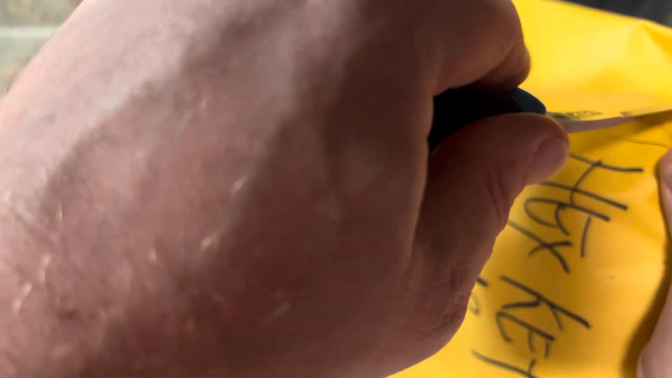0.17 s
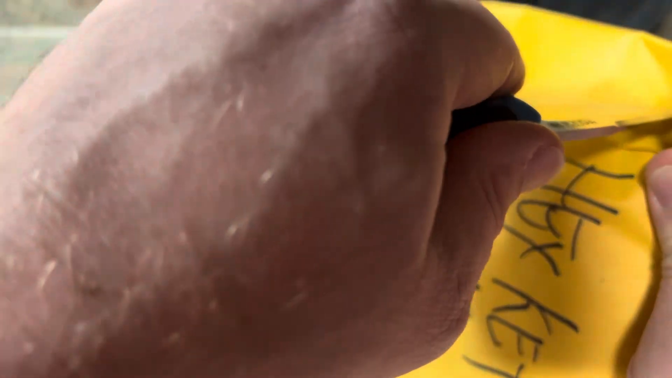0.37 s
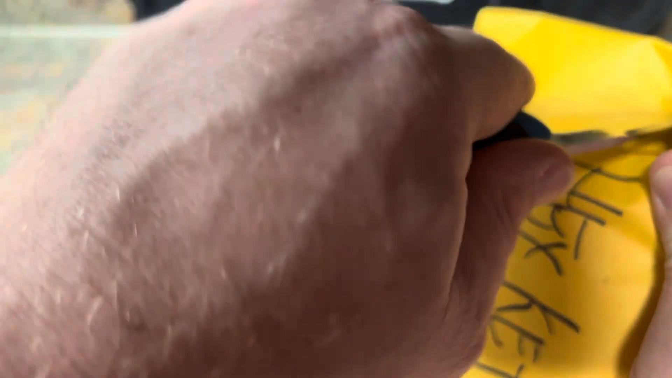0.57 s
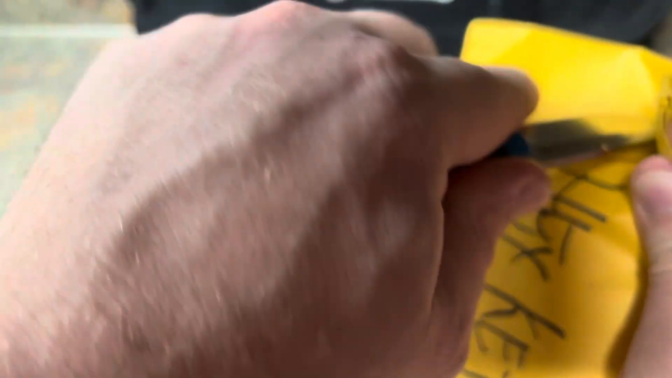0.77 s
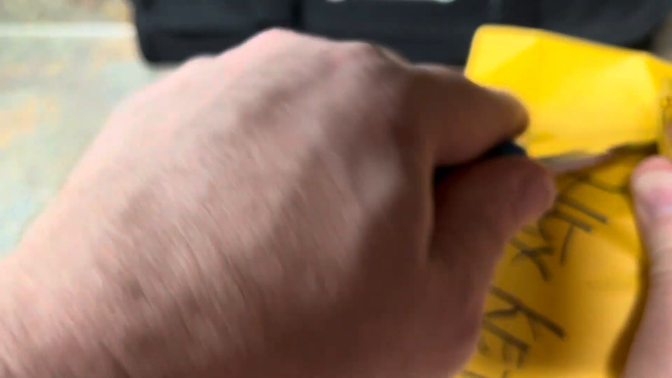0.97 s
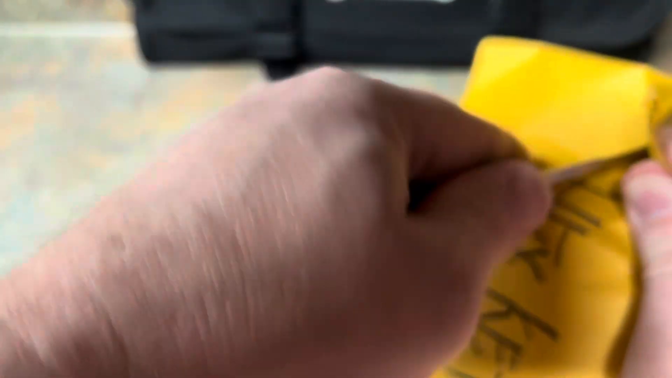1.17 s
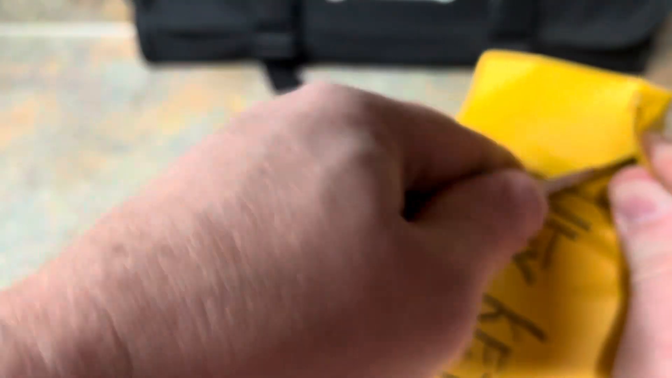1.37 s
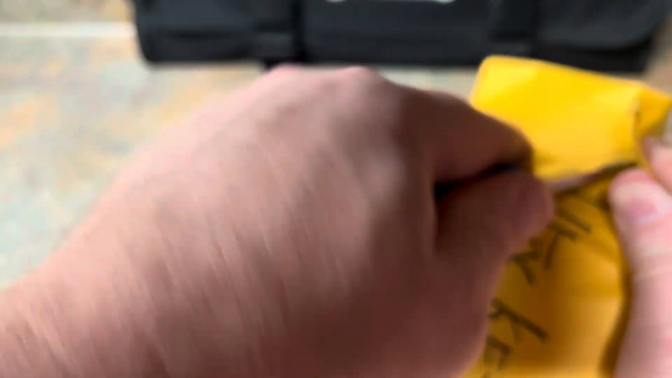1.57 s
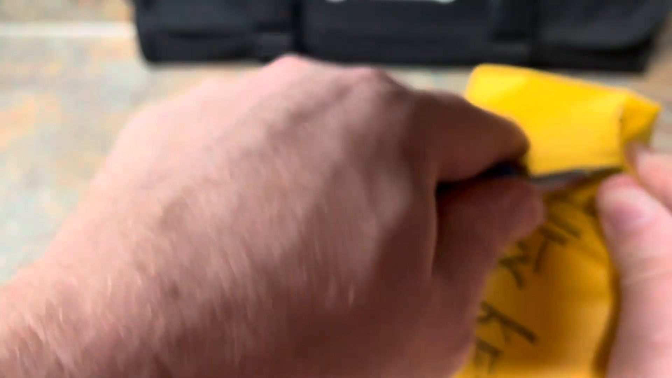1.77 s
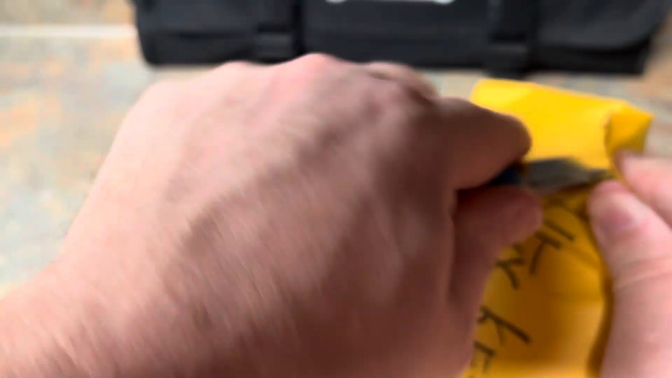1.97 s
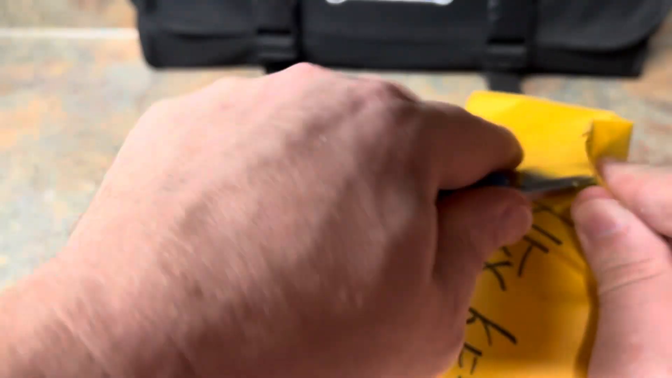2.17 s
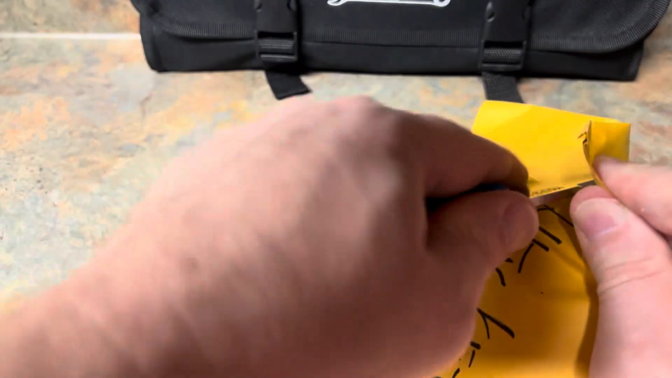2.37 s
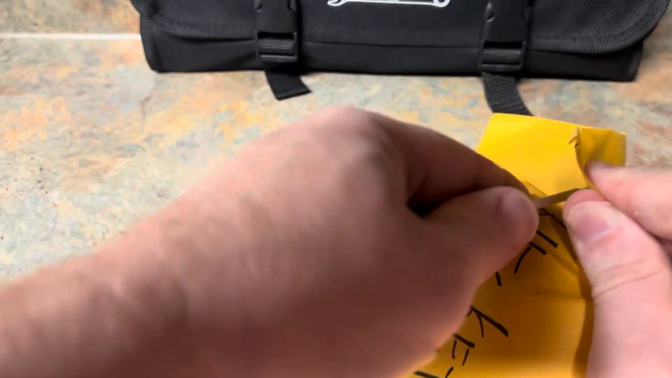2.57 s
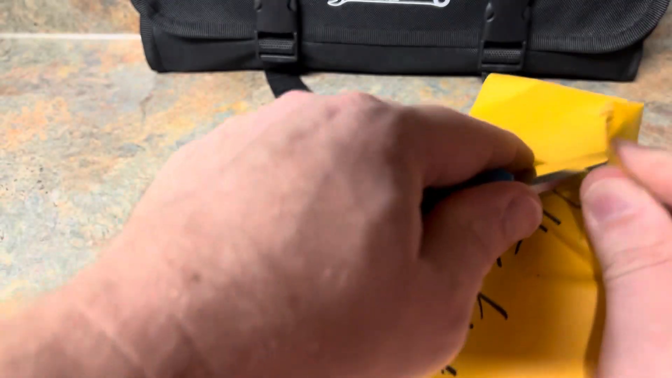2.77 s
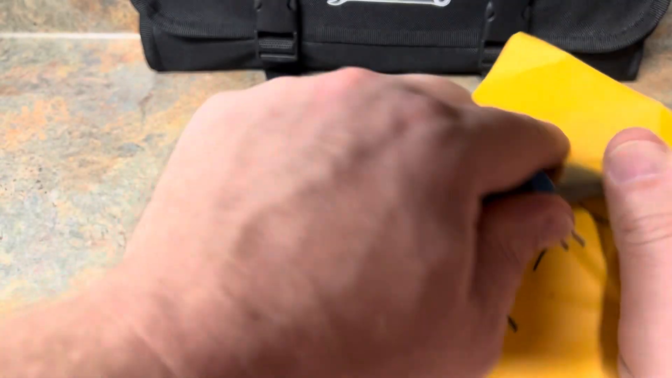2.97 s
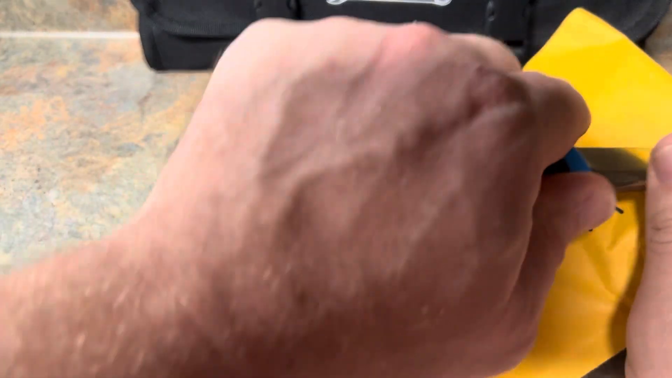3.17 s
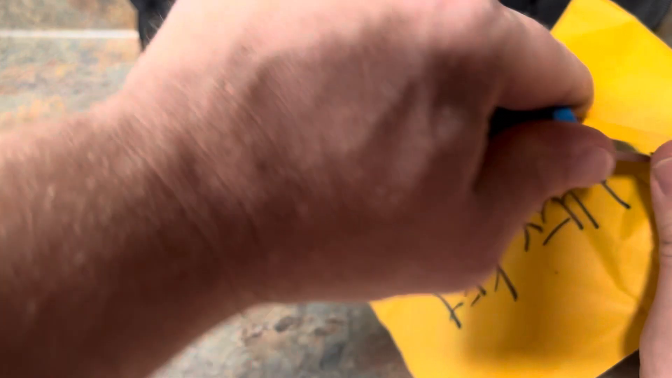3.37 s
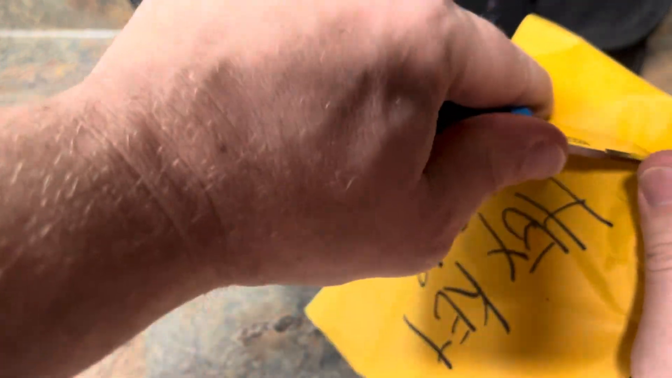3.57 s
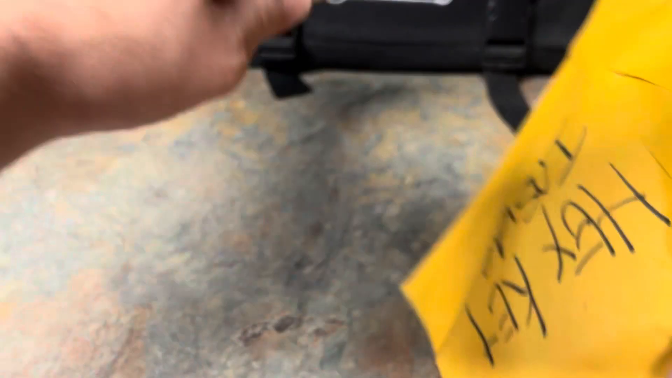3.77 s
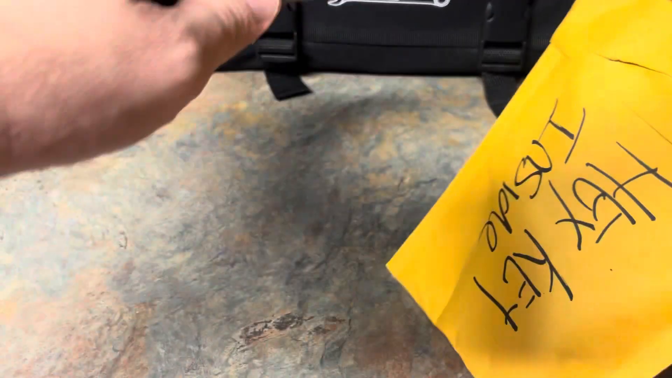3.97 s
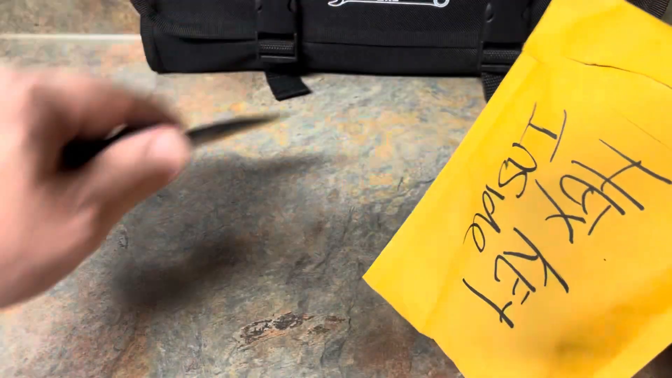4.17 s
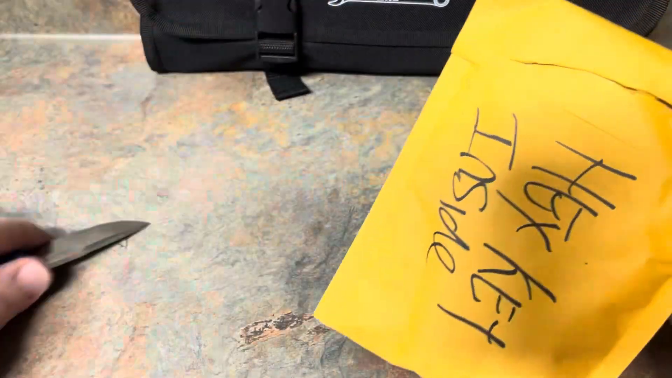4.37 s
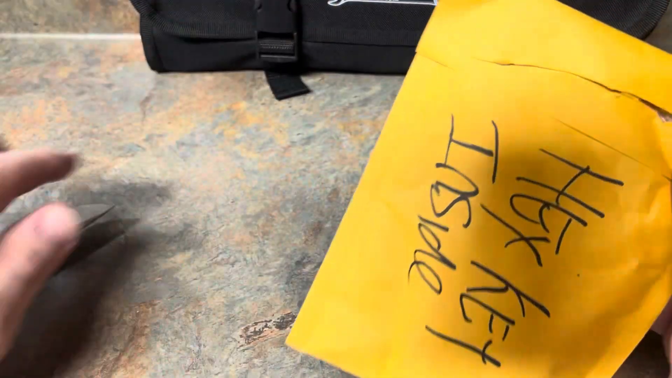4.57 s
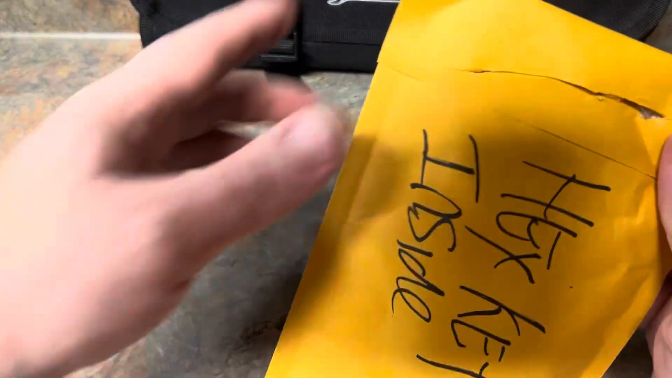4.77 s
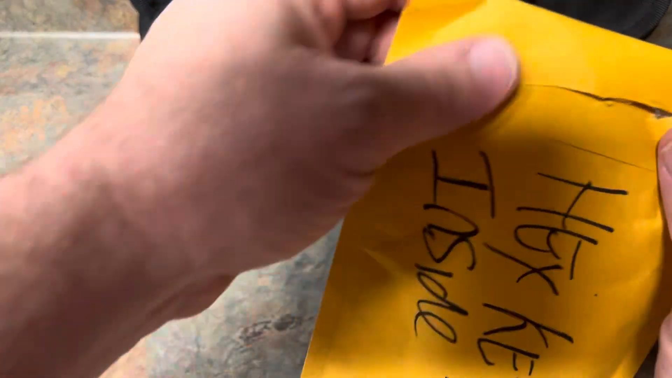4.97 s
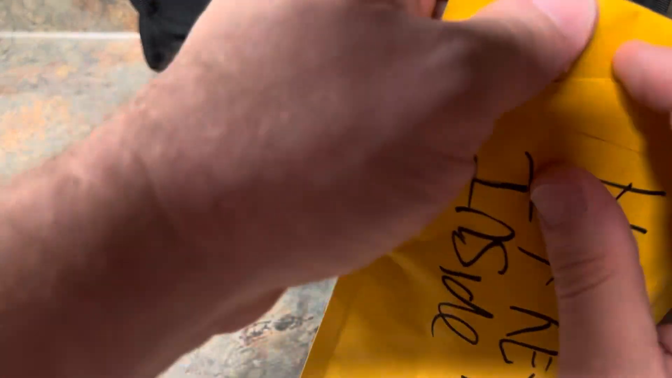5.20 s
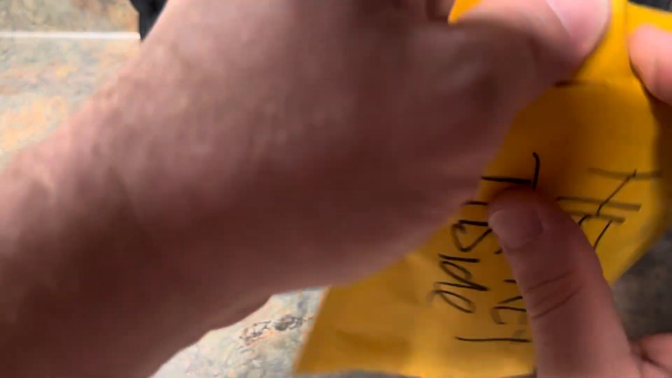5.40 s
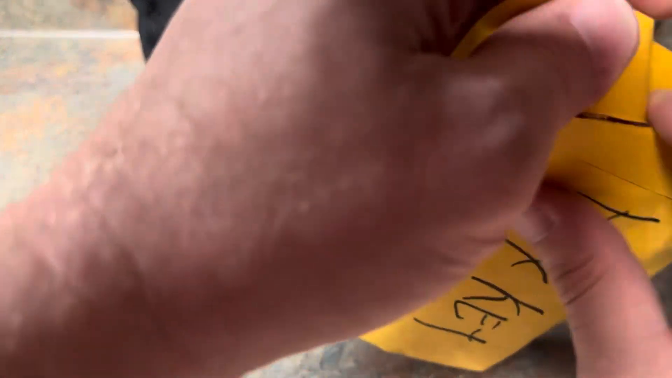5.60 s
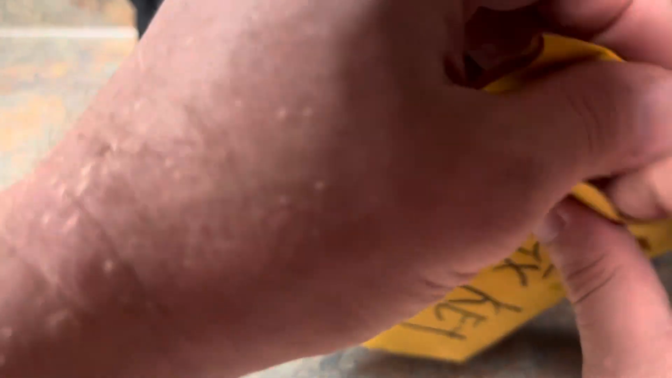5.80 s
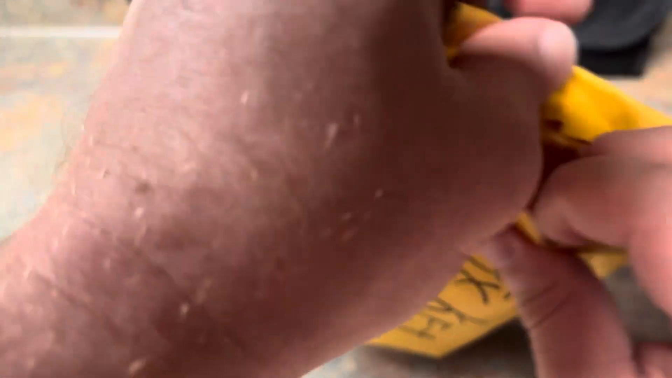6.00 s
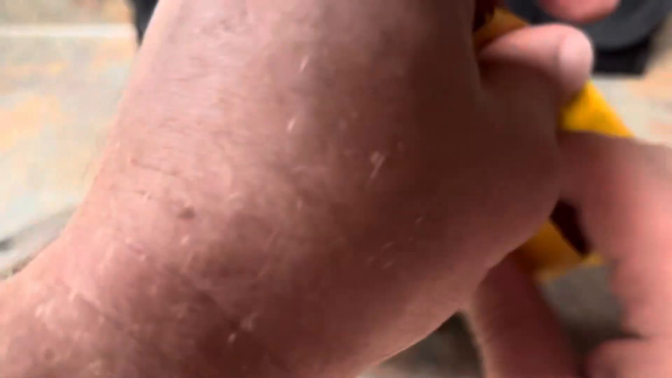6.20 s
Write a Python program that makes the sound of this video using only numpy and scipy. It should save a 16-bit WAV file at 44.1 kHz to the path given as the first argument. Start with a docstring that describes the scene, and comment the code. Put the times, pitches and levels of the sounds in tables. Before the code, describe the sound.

From the start, a knife saws at a padded paper envelope in quiet, uneven scrapes, with scattered small crackles and a sharper snap at about 0.8 seconds. The rubbing grows a little stronger around 3 seconds. At about 3.6 seconds the blade slashes through in one short, bright rip, the loudest moment, with a dull bump on the counter. After a little faint rustling, the knife drops onto the counter at 4.3 seconds and bounces and rocks until about 4.6, a quick run of hard knocks with a brief metallic ring. From 4.8 seconds to the end, just past 6, hands pull the envelope apart with denser crinkling, hissing friction and crisp paper snaps. Everything sounds close, in a small room with little echo and a faint, steady low rumble of ventilation.

```python
"""A padded paper mailer is sawn at with a knife on a counter, slashed open, and pulled apart by hand.
Paper rustles and snaps; the knife is dropped and rocks on the counter; ventilation rumbles in the room."""
import sys
import numpy as np
from scipy import signal
from scipy.fft import rfft, irfft
from scipy.io import wavfile

SR = 44100
rng = np.random.default_rng(int(sys.argv[2]) if len(sys.argv) > 2 else 0)


def transcribe(signal):
    """Save signal, clipped to [-1, 1], as a 16-bit WAV file at the path in sys.argv[1]."""
    frames = np.atleast_2d(signal).T
    limited = np.clip(frames, -1, 1)
    pcm = np.round(limited * 32767).astype(np.int16)
    wavfile.write(sys.argv[1], SR, pcm)


N = 275184

# creases snap: (s, peak dB, crack above 5 kHz dB, body dB, thump dB, pitch of the body Hz, pitch of the thump Hz)
SNAPS = [(0.134, -32, -9.5, -27, -3.5, 930, 675), (0.155, -31.5, -9.5, -23, -23, 2740, 283), (0.279, -32, -9, -20, -15, 1350, 595),
         (0.307, -25.5, -9.5, -16, -21, 2700, 370), (0.341, -30, -6, -21, -21, 1270, 264), (0.439, -32, -10.5, -18, -14, 3730, 275),
         (0.536, -28.5, -12.5, -17, -15.5, 2160, 262), (0.575, -36.5, -5, -14, -10, 2740, 226), (0.607, -39, -1, -20, -26, 1590, 221), (0.628, -42, -4, -15, -17, 3500, 635),
         (0.752, -29, -12, -14, -19, 1590, 280), (0.82, -8.5, -18.5, -11.5, -22, 1950, 487),
         (0.861, -27.5, -8.5, -8.5, -28, 2320, 670), (0.918, -34, -13, -19, -6, 1600, 347), (0.972, -44, -4.5, -26, -18, 2140, 258), (1.04, -43, -9, -8, -20, 3250, 237),
         (1.088, -32, -5, -17, -5.5, 2110, 600),
         (1.104, -29.5, -3.5, -17, -18, 926, 630), (1.135, -26.5, -9.5, -12, -3.5, 845, 643), (1.175, -34.5, -3, -18, -20, 1290, 256),
         (1.211, -31, -8, -22, -16, 870, 220), (1.225, -30.5, -7.5, -15, -18, 3140, 630), (1.283, -35, -3, -11, -17, 2130, 222),
         (1.354, -18.5, -31, -8.5, -14, 880, 646), (1.518, -34, -10, -8, -15, 3480, 428), (1.554, -34, -3, -13, -27, 3160, 681),
         (1.593, -23, -15, 0, -8.5, 896, 636), (1.695, -21, -18, -21.5, -37, 2420, 234), (1.796, -26.5, -9.5, -16, -12, 2630, 420),
         (1.963, -30, -7.5, -11.5, -13, 2320, 273), (2.071, -14.5, -35, -7, -50, 3920, 552), (2.268, -28.5, -7, -16, -24, 3120, 293),
         (2.419, -37, -6, -15, -13, 910, 250), (2.508, -33.5, -10, -5, -6, 3050, 650), (2.542, -21, -25, -5.5, -24, 2610, 670), (2.739, -28.5, -16, -7.5, -31, 2290, 318),
         (2.8, -35.5, -27, -9, -5, 1570, 670), (2.967, -30.5, -19, -4, -2.5, 1840, 242), (3.098, -27, -5, -31, -24, 3820, 221),
         (3.172, -29.5, -20, -9, -8.5, 790, 790), (3.195, -26.5, -9.5, -13, -38, 3460, 323), (3.374, -23, -8.5, -17, -23, 2750, 365),
         (3.483, -28.5, -5.5, -12.5, -32, 2030, 729), (3.609, -7.5, -11.5, -18, -28, 870, 640), (3.623, -11, -3.5, -6, -32, 820, 797),
         (3.629, -2.5, -16, -11, -13.5, 3170, 673), (3.642, -5, -5, -7, -8, 3980, 375), (3.655, -10.5, -21, -3, -21, 780, 650),
         (3.665, -6.5, -23, -5.5, -21, 865, 668), (3.71, -20.5, -23, -6.5, -5, 1100, 460), (3.762, -22.5, -5, -19, -5, 3100, 218),
         (3.832, -29, -28, -5, -4.5, 820, 490), (4.769, -32.5, -21, -9.5, -16, 1550, 736), (4.869, -18, -37, -4, -18.5, 1560, 670),
         (4.931, -24, -13, -5.5, -6, 1200, 485), (4.961, -30, -6, -21, -6.5, 1610, 290), (5.065, -18, -13.5, -6, -15.5, 2560, 235),
         (5.094, -12.5, -15, -5.5, -14, 1315, 308), (5.096, -15.5, -17, -3.5, -38, 3190, 308), (5.108, -20.5, -39, -11, -9, 2410, 285), (5.173, -23, -13, -7.5, -9, 1590, 255),
         (5.396, -16.5, -15.5, -6.5, -5.5, 1590, 324), (5.421, -19.5, -12, -3.5, -17, 1080, 293), (5.463, -14.5, -9, -7, -40, 1235, 490),
         (5.479, -28.5, -13, -5, -27, 830, 490), (5.599, -22.5, -12, -5.5, -20, 1140, 340), (5.624, -40, -14, -13, 3.5, 1290, 470),
         (5.663, -21.5, -9, -5, -9, 1310, 824), (5.673, -13.5, -12, -9.5, -13.5, 1150, 283), (5.706, -24.5, -24, -3, -1.5, 820, 320),
         (5.74, -24, -8, -20, -13, 1980, 263), (5.835, -23, -8, -2.5, -37, 1380, 567), (5.847, -18.5, -5, -15, -43, 1960, 692), (5.928, -25.5, -1, -22, -23, 5040, 517),
         (5.949, -15.5, -8.5, -17, -17, 2750, 553), (5.981, -22, -6, -31, -31, 1320, 670), (6.033, -10.5, -8.5, -15, -18, 1690, 216),
         (6.038, -23.5, -11, -7, -13, 2590, 764), (6.051, -25, -13, -27, -11, 1700, 790), (6.193, -25, -5, -19, -2.5, 1370, 220), (6.212, -12, -12.5, -16, -12, 1520, 307)]
# the knife lands, bounces and rocks: (s, peak dB, handle ring dB, blade ring dB, metal tick dB)
KNOCKS = [(4.301, -15, -10.5, -2, -12.5), (4.334, -23.5, -4, -28, 1.5), (4.365, -11.5, -7.5, -15, -30),
          (4.39, -21, -18, -24, -14.5), (4.431, -18, -11, -24, -27), (4.452, -9.5, -17.5, -40, -19.5),
          (4.463, -17, -34, -33, -44), (4.48, -9.5, -9.5, -26, -32), (4.494, -12.5, -16, -17, -34),
          (4.514, -14, -11, -18, -34), (4.527, -16, -22, -26, -35), (4.553, -16.5, -18, -31, -27),
          (4.584, -18.5, -8, -26, -28), (4.605, -31, -5, -28, -47), (4.619, -26, -18, -39, -25)]
HANDLE = [(502, -0.5, 0.044), (693, 2, 0.12), (820, 6.5, 0.035), (957, 6.5, 0.038), (1174, -1, 0.065), (1280, -1, 0.024), (1590, -2, 0.054), (2022, -7.5, 0.052)]   # (Hz, dB, t60 s)
COUNTER = [(66.1, -3.5, 0.27), (98.6, 3.5, 0.087), (142.7, 0, 0.14), (190, 1.5, 0.12), (254.3, 3, 0.097), (336, -3.5, 0.16)]   # (Hz, dB, t60 s)
# the counter takes a soft push, or booms under the rocking knife: (s, peak dB)
PUSHES = [(2.299, -32.5), (2.97, -32), (3.001, -35), (3.078, -39.5), (3.654, -16), (3.673, -17.5), (3.689, -25),
          (3.781, -31), (4.312, -40), (4.458, -27), (4.551, -31), (4.895, -33)]
HISS = [(2500, -1.5), (4200, -3.5), (5000, -6.5), (5800, -2), (8500, 0), (10500, -3.5), (12000, -8.5), (14000, -19), (16000, -0.5)]   # (Hz, dB per Hz)
FLEX = [(120, -16), (220, 1), (480, -2), (600, -3.5), (670, 9.5), (750, -3.5), (900, -12.5), (1200, -40.5)]   # (Hz, dB per Hz)
RUMBLE = [(13, -59), (22, -59), (39, -1.5), (60, 4.5), (108, -3.5), (139, 0.5), (171, -11.5), (258, -16), (359, -30),
          (400, -37), (520, -27), (880, -120)]   # (Hz, dB per Hz)
RUMBLE_DB = -49
PORT_PHASE = [(0, 0), (780, -0.9), (1980, 0.4), (3190, -0.7), (6800, -0.2), (8100, -1.2), (9990, 2.5), (10900, 3.4),
              (11700, 6.1), (12700, 6.3), (13200, 9.1), (14400, 9.6), (15200, 12.7), (16500, 12.3)]   # (Hz, radians by which the left port leads)  # fixed
PORT_BALANCE = [(60, 0), (180, 1), (550, -1), (1650, -4.5), (4970, -2.5), (15000, 1)]   # (Hz, left-right dB)
LIKENESS = [(30, .995), (90, 0.97), (250, 0.88), (1000, 0.34), (4000, 0.47), (10000, 0.97)]   # (Hz, left-right likeness)
ROOM_T60_S, ROOM_DB, WALL_CUT_HZ = 0.33, -13, 8800
CUTOFF_HZ = 16700   # fixed
HZ = np.fft.rfftfreq(N, 1 / SR) + 1e-3   # fixed
BLADE = [(1130, 3, 0.24), (1238, 4, 0.068)]   # (Hz, dB, t60 s)
TICK = [(1500, 0.5), (2800, -2.5), (4000, -0.5), (6500, -1.5), (9000, -5), (12000, -10), (16000, -14)]   # (Hz, dB per Hz)
# a long stroke makes the taut sheet sing in a narrow, sinking band: (s, length s, peak dB, first pitch Hz, last pitch Hz)
ZIPS = [(3.017, 0.1, -48, 4060, 3700), (3.18, 0.08, -51, 3270, 3100), (5.291, 0.064, -50.5, 2770, 2670), (5.725, 0.12, -43, 2017, 1850)]
BASS_CUT_HZ = 44
RUMBLE_WAVER_DB = 1.0
# blade, fingers or the rocking knife rub once: (s, hold s, hiss dB, rasp of the sheet dB, low flexing dB)
STROKES = [(0.013, 0.011, -52, -57, -51.5), (0.165, 0.011, -54, -71, -67), (0.282, 0.056, -52.5, -49, -49), (0.447, 0.076, -63.5, -74, -64), (0.557, 0.074, -55, -72, -54),
           (0.663, 0.025, -57.5, -48, -51), (0.698, 0.026, -55, -45.5, -51), (0.833, 0.012, -59.5, -46, -46), (0.872, 0.021, -62, -65, -58), (0.975, 0.07, -67, -65, -64), (1.083, 0.036, -53.5, -56, -51),
           (1.158, 0.055, -57, -51, -55), (1.314, 0.035, -49, -52, -51), (1.48, .01, -57.5, -75, -67), (1.576, 0.025, -50.5, -44, -56),
           (1.64, 0.057, -58.5, -57, -72), (1.798, 0.022, -50.5, -65, -52), (1.866, .04, -60.5, -68, -56), (1.934, 0.022, -53.5, -66, -53.5), (2.005, .025, -55.5, -73, -64), (2.045, 0.096, -54, -57, -54),
           (2.13, 0.074, -60.5, -52, -54), (2.271, 0.022, -46, -66, -45), (2.349, 0.031, -56, -57, -60), (2.513, 0.0059, -48, -56, -47.5), (2.578, .16, -59.5, -58, -53.5),
           (2.739, 0.23, -51, -67, -56.5), (2.967, 0.16, -47.5, -53, -74), (3.218, 0.017, -50.5, -46, -69), (3.293, 0.049, -54, -49, -56), (3.386, 0.082, -43, -51, -50),
           (3.504, 0.17, -50, -51, -47), (3.904, 0.06, -52, -47.5, -47), (4.034, 0.032, -52, -57, -65), (4.128, 0.23, -54, -72, -71),
           (4.363, 0.045, -68, -33, -28), (4.489, 0.087, -54, -44, -34.5), (4.777, .08, -54, -53.5, -63), (4.877, 0.054, -44.5, -50, -35), (4.956, 0.064, -48, -48, -72),
           (5.132, 0.064, -46, -49, -57), (5.256, 0.14, -45, -60, -58), (5.413, 0.015, -47, -46, -51), (5.468, 0.037, -46.5, -45, -63),
           (5.54, 0.036, -52.5, -57, -44), (5.602, 0.12, -46, -56, -56), (5.732, 0.066, -43.5, -54, -51), (5.83, 0.025, -44, -47, -62), (5.875, 0.052, -48.5, -56, -67), (5.95, 0.035, -42, -45, -61), (5.985, 0.028, -39, -48, -54),
           (6.074, 0.22, -42, -48, -57), (6.202, .03, -40, -52, -42)]
REST_DB = [-66.5, -56.5, -62]   # hiss, rasp and flexing of the sheet held between strokes
RASP_HZ, RASP_OCTAVES_PER_DB = 1890, 0.19   # at a hiss of -55 dB; harder rubbing is brighter
# the final slash: (s, hiss dB, rasp dB, flexing dB)
SLASH = [(3.594, -60, -49, -40), (3.607, -41, -44, -37), (3.612, -31, -19, -51), (3.619, -33, -23, -42), (3.634, -19, -24, -26),
         (3.645, -25.5, -29, -10.5), (3.662, -23.5, -24, -22), (3.672, -31, -31, -20), (3.69, -38.5, -34, -40),
         (3.72, -41, -46, -51), (3.875, -54, -61, -58)]
SNAP_SCATTER_DB = 2   # left-right spread of the creases  # fixed
TICKS, TICK_DB = 80, -45   # faint snaps at random moments: count, mean peak  # fixed
TICK_PARTS_DB = [-3, -14, -18]   # their crack, body and thump
ZIP_PEAK_SHARE, ZIP_EDGE_DB = 0.79, -10   # swells to this share of its length; edges lie this far down
RISE_DB_PER_S = 450
FALL_DB_PER_S = [235, 180, 169]   # hiss, rasp, flexing


def amp(db):
    """dB to gain."""
    return 10 ** (np.asarray(db) / 20)


def rms_one(x):
    """Scale to unit rms."""
    return x / np.sqrt(np.mean(x ** 2) + 1e-20)


def in_time(rows):
    """Curve columns at every sample."""
    s, *columns = np.transpose(rows)
    return [np.interp(np.arange(N) / SR, s, c) for c in columns]


def at_hz(points, hz):
    """Read a spectrum on a log axis."""
    points = np.array(points, float)
    return np.interp(np.log(hz), np.log(points[:, 0] + 1), points[:, 1])


def drift(rate):
    """Slow chance of spread 1."""
    r = np.exp(-80 * np.pi * rate / SR)  # fixed
    slow = signal.lfilter([1], [1, -2 * r, r * r], rng.standard_normal(N // 40 + 2002))[2000:]
    return np.interp(np.arange(N) / 40, np.arange(len(slow)), rms_one(slow))


def colour(x, spectrum):
    """Shape by a spectrum; white noise keeps its rms."""
    return irfft(rfft(x) * rms_one(amp(at_hz(spectrum, HZ))), N)


def ring(clicks, hz, t60):
    """A unit click sets a sine of height 1 ringing."""
    r, w = amp(-60 / (t60 * SR)), 2 * np.pi * hz / SR
    return signal.lfilter([0, np.sin(w)], [1, -2 * r * np.cos(w), r * r], clicks + 1e-18)


def train(times, sizes):
    """One click at each time."""
    out = np.zeros(N)
    np.add.at(out, np.minimum((np.asarray(times) * SR).astype(int), N - 1), sizes)
    return out


def stereo_noise():
    """Two channels whose likeness falls with pitch."""
    mid, side = rfft(rng.standard_normal((2, N)))
    alike = np.clip(at_hz(LIKENESS, HZ), 0, 1)
    return irfft((np.sqrt(1 + alike) * mid + np.sqrt(1 - alike) * side * [[1], [-1]]) / np.sqrt(2), N)


def grains(per_s, spread_db, t60):
    """Loudness of tiny fibre breaks: sudden, clumped, quickly dying."""
    born = rng.random(N) < per_s * amp(6 * drift(15)) / SR
    return rms_one(dying(born * amp(spread_db * np.minimum(rng.exponential(1, N), 4)), t60))


def rustle():
    """Friction noise, part smooth and part broken into grains; the rasp is loudest around its pitch."""
    hiss_db, rasp_db, flex_db = rubbing()
    rasp_hz = RASP_HZ * 2 ** (RASP_OCTAVES_PER_DB * np.clip(hiss_db + 55, -15, 8))   # fixed
    crackle = grains(per_s=180.0, spread_db=1.0, t60=0.01)
    swell_db = 1.2 * drift(15)   # fixed
    noise = stereo_noise()
    out = amp(hiss_db + swell_db + 1.54 * drift(35)) * colour(noise * (1.153 + .5 * crackle), HISS)
    out += amp(flex_db + swell_db) * colour(noise * (0.26 + 0.17 * crackle), FLEX)
    rough, edges = noise * (1.0 + 0.1 * crackle), np.geomspace(800, 5200, 9)
    for low, high in zip(edges, edges[1:]):
        band = signal.sosfilt(signal.butter(2, [low, high], "band", fs=SR, output="sos"), rough)
        octaves = np.log2(np.sqrt(low * high) / rasp_hz)
        patch_db = 1.5 * drift(20)   # fixed
        out += amp(rasp_db - 8.5 - 13.7 * octaves ** 2 + swell_db + patch_db) * rms_one(band)
    return out


def snaps():
    """A crease gives: a bright crack, and the sheet rings a few cycles on the modes near its two pitches."""
    rows = np.vstack([SNAPS, faint_snaps()])
    s, peak_db, crack_db, body_db, thump_db, body_hz, thump_hz = rows[np.argsort(rows[:, 0])].T
    pitches = np.geomspace(230, 5200, 26)
    luck = rng.standard_normal((len(s), len(pitches), 2))
    out = crack(s, peak_db + crack_db - 1.0, colour(stereo_noise(), HISS), t60=0.0047)
    sheet = pops(s + .0007, peak_db + body_db - 5, body_hz, cycles=9.6) + pops(s + .0015, peak_db + thump_db - 1.5, thump_hz, cycles=7.4)
    for k, hz in enumerate(pitches):
        body = amp(body_db - 15.0 - 3.3 * np.log2(hz / body_hz) ** 2)
        thump = amp(thump_db - 12 - 25.0 * np.log2(hz / thump_hz) ** 2)
        size = amp(peak_db + 0.7 * luck[:, k, 0]) * np.sign(luck[:, k, 1])
        late_s = .0005 + 0.68 / hz   # low modes take longer to start
        sheet += ring(train(s + late_s, size * (body + thump)), hz, 0.021 + 3.7 / hz)
    latest = np.maximum(np.searchsorted(s, np.arange(N) / SR) - 1, 0)
    place_db = SNAP_SCATTER_DB * rng.standard_normal(len(s))[latest]   # each snap keeps its place, off the centre of the sheet
    return (out + sheet) * amp([place_db / 2, -place_db / 2])


def struck(times, level_db, modes, scatter_db):
    """Every blow strikes each mode with a strength of its own."""
    luck = rng.standard_normal((len(times), len(modes)))
    return sum(ring(train(times, amp(level_db + db + scatter_db * luck[:, k]) * (-1) ** k), hz, t60)
               for k, (hz, db, t60) in enumerate(modes))


def knife():
    """Handle and blade ring briefly, metal ticks, and the counter booms under it."""
    s, peak_db, handle_db, blade_db, tick_db = np.transpose(KNOCKS)
    scatter_db = 2   # fixed
    rings = struck(s, peak_db + handle_db - 9, HANDLE, scatter_db) + struck(s, peak_db + blade_db - 8, BLADE, scatter_db / 2)
    tick = crack(s, peak_db + tick_db + 2.5, colour(stereo_noise(), TICK), t60=0.0066)
    return rings + tick + soften(struck(s, peak_db - 11, COUNTER, scatter_db), 710)


def pushes():
    """A hand or the parcel leans on the counter, or the rocking knife knocks it; each stirs only its lowest
    modes."""
    s, peak_db = np.transpose(PUSHES)
    return soften(struck(s, peak_db + 10, COUNTER, 1.0), 47.3)


def room(x):
    """Dying stereo noise as echo pattern, duller than the direct sound."""
    t = np.arange(int(SR * .5)) / SR
    tail = rng.standard_normal((2, len(t))) * amp(-60 * t / ROOM_T60_S) * (t > .004)
    tail = signal.lfilter([1], [1, -np.exp(-2 * np.pi * WALL_CUT_HZ / SR)], tail)
    tail = signal.sosfilt(signal.butter(2, 250, "high", fs=SR, output="sos"), tail)   # a small room adds no wide bass
    tail /= np.sqrt(np.sum(tail ** 2, axis=1, keepdims=True))
    return signal.fftconvolve(x, tail, axes=1)[:, :N]


def dying(clicks, t60):
    """Each click starts a loudness that dies away."""
    return signal.lfilter([1], [1, -amp(-60 / (t60 * SR))], clicks + 1e-18)


def crack(times, level_db, noise, t60):
    """A bright burst that builds within a millisecond, with a fainter rustling tail."""
    clicks = train(times + 0.00041, amp(level_db))
    return noise * (2.98 * (dying(clicks, t60) - dying(clicks, t60 / 3)) + amp(-9.0) * dying(clicks, 0.06))


def soften(x, hz):
    """A soft contact: two one-pole low-passes."""
    r = np.exp(-2 * np.pi * hz / SR)
    return signal.lfilter([(1 - r) ** 2], [1, -2 * r, r * r], x)


def zips():
    """Noise a few hundred Hz wide, carried on a gliding pitch."""
    out, t = np.zeros(N), np.arange(N) / SR
    for s, length, peak_db, first_hz, last_hz in ZIPS:
        share = (t - s) / length
        level_db = peak_db + np.interp(share, [0, np.clip(ZIP_PEAK_SHARE, .1, .9), 1], [ZIP_EDGE_DB, 0, ZIP_EDGE_DB])
        turn = 2 * np.pi * np.cumsum(np.interp(share, [0, 1], [first_hz, last_hz])) / SR
        slow = soften(rng.standard_normal((2, N)), 350)
        out += amp(level_db) * rms_one(slow[0] * np.cos(turn) + slow[1] * np.sin(turn)) * ((share > 0) & (share < 1))
    return out


def pops(times, level_db, pitch_hz, cycles):
    """The pocket beside the crease rings on its own pitch, swelling over the first cycle."""
    out, t = np.zeros(N + 4096), np.arange(4096) / SR
    for s, size, hz in zip(times, amp(level_db), pitch_hz):
        swell = (1 - np.exp(-1.5 * hz * t)) * amp(-60 * t / (0.02 + cycles / hz))
        out[int(s * SR):int(s * SR) + 4096] += size * swell * np.sin(2 * np.pi * hz * t)
    return out[:N]


def rubbing():
    """Hiss, rasp and flexing in dB: every stroke rises, holds and falls alike; the slash follows its own course."""
    t = np.arange(0, N, 40) / SR   # fixed
    s, hold, *levels_db = np.transpose(STROKES)[:, :, None]
    early, late = np.maximum(s - t, 0), np.maximum(t - s - np.abs(hold), 0)
    at, *slash_db = np.transpose(SLASH)
    power = [np.sum(amp(db - RISE_DB_PER_S * early - fall * late) ** 2, axis=0) + amp(rest_db) ** 2
             + amp(np.interp(t, at, cut_db, -200, -200)) ** 2  # fixed
             for db, fall, rest_db, cut_db in zip(levels_db, FALL_DB_PER_S, REST_DB, slash_db)]
    return in_time(np.transpose([t, *(10 * np.log10(power))]))


def faint_snaps():
    """Rows like the loud snaps, with time, strength and pitches left to chance."""
    luck = rng.random((TICKS, 4))
    parts_db = np.ones((TICKS, 1)) * TICK_PARTS_DB
    return np.column_stack([luck[:, 0] * N / SR, TICK_DB + 12 * (luck[:, 1] - .5), parts_db, 800 * 4.5 ** luck[:, 2], 220 * 3 ** luck[:, 3]])  # fixed


def scene():
    """Paper, knife and counter in the room, over the ventilation."""
    hits = snaps() + knife() * amp([[-1], [1]]) + pushes()
    rumble = amp(RUMBLE_DB + RUMBLE_WAVER_DB * drift(3.0)) * colour(stereo_noise(), RUMBLE)
    return hits + amp(ROOM_DB) * room(hits) + rustle() + zips() + rumble


def record(dry):
    """Two ports differ in phase and level with pitch; the deep bass and the top are cut."""
    phase = np.interp(HZ, *np.transpose(PORT_PHASE))
    half = amp(at_hz(PORT_BALANCE, HZ) / 2) * np.exp(.5j * phase)
    ports = irfft(rfft(dry) * [half, 1 / half], N)
    ports = signal.sosfilt(signal.butter(2, BASS_CUT_HZ, "high", fs=SR, output="sos"), ports)
    return signal.sosfilt(signal.cheby2(12, 70, CUTOFF_HZ, fs=SR, output="sos"), np.clip(ports, -1, 1))


dry = scene()
out = record(dry)
transcribe(out)
```